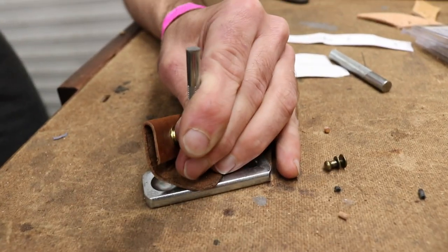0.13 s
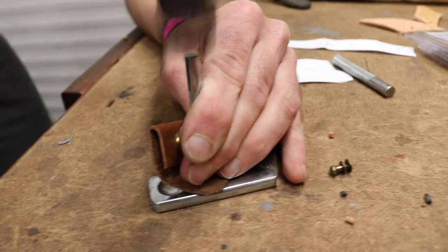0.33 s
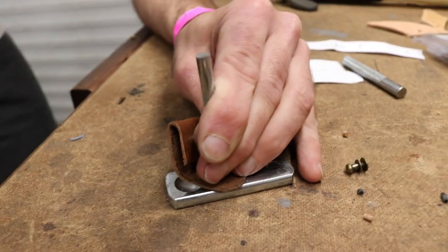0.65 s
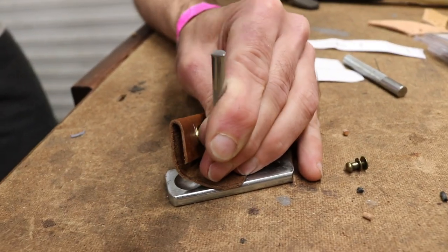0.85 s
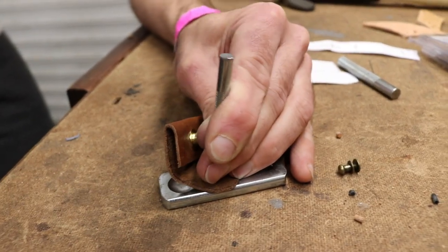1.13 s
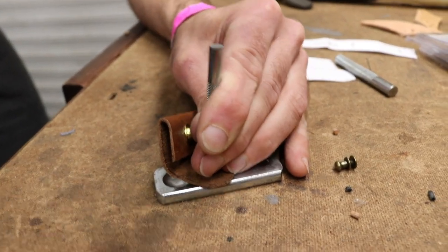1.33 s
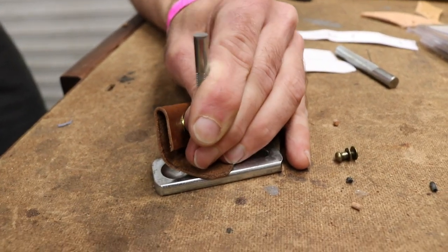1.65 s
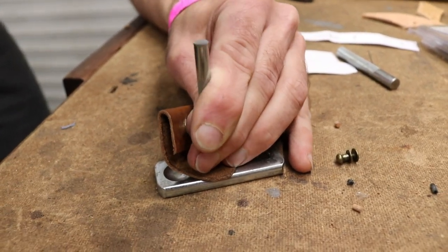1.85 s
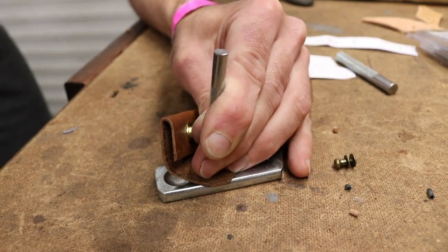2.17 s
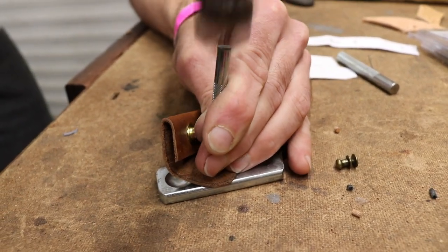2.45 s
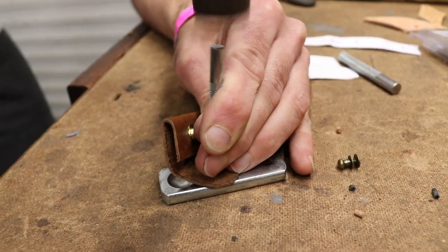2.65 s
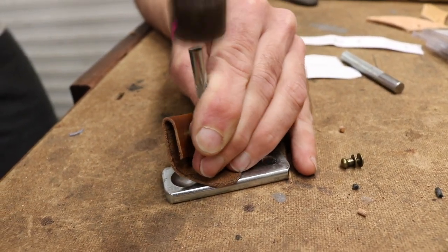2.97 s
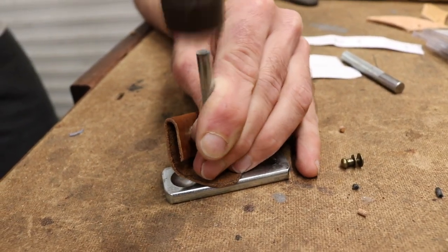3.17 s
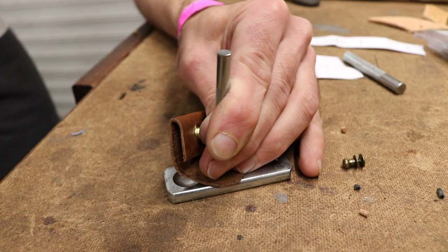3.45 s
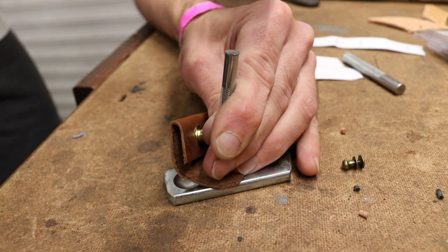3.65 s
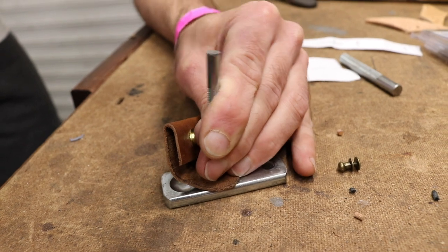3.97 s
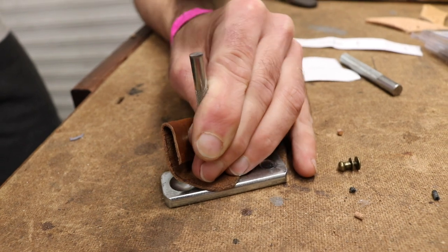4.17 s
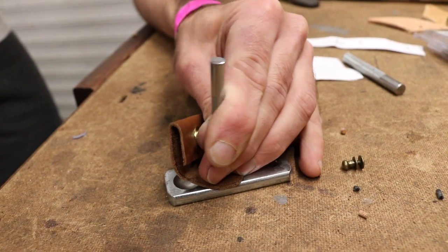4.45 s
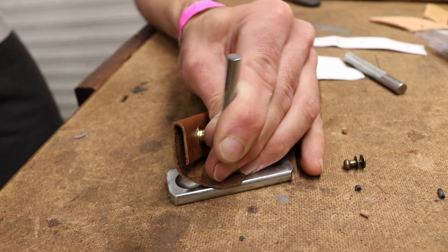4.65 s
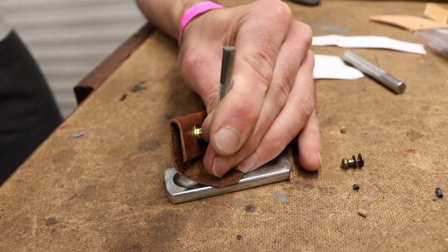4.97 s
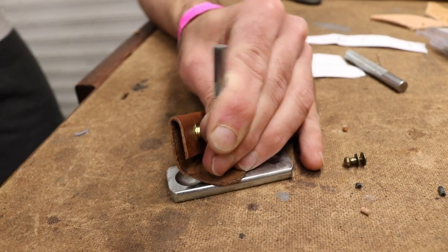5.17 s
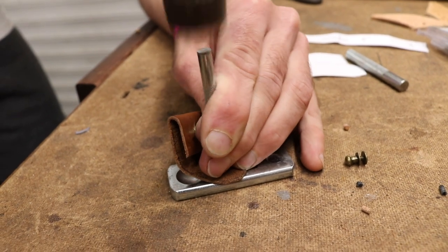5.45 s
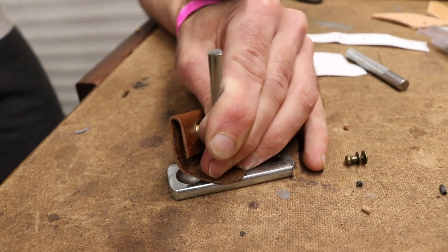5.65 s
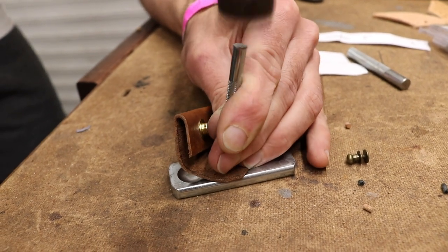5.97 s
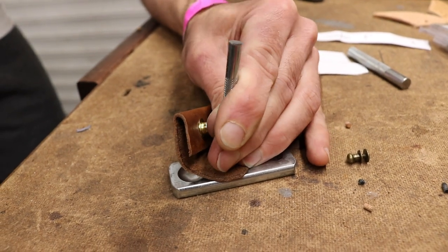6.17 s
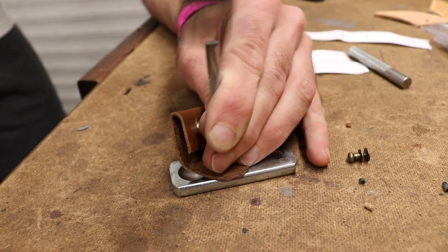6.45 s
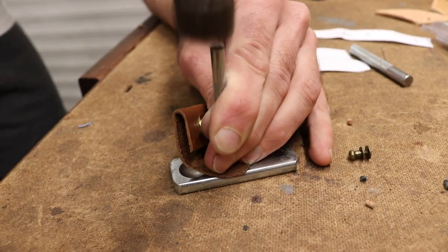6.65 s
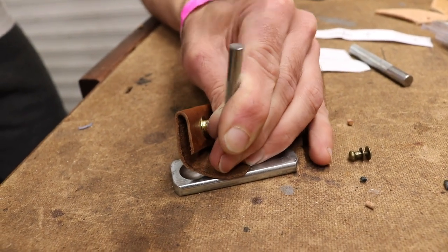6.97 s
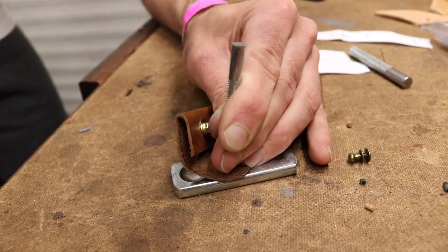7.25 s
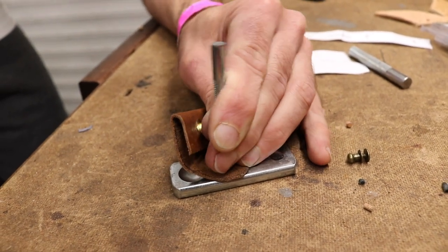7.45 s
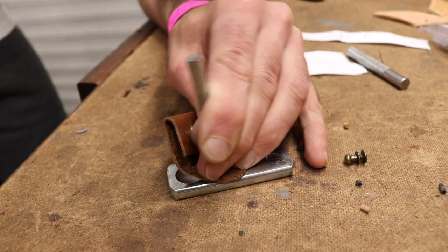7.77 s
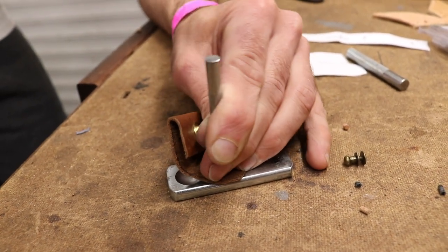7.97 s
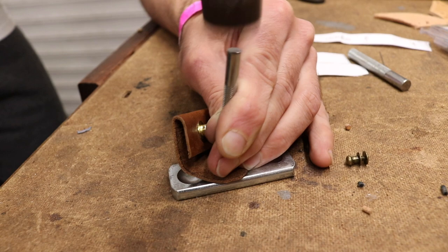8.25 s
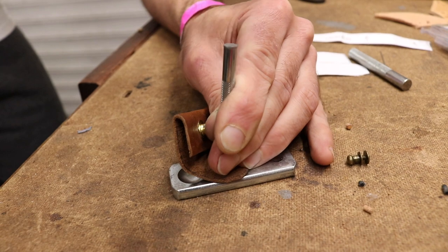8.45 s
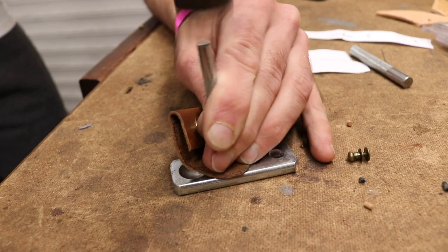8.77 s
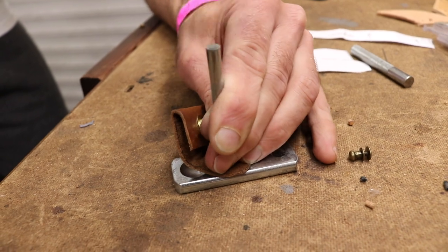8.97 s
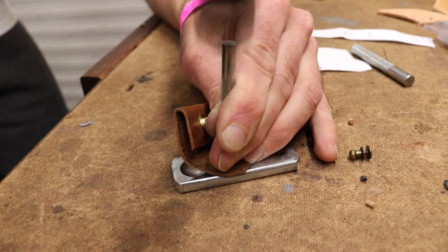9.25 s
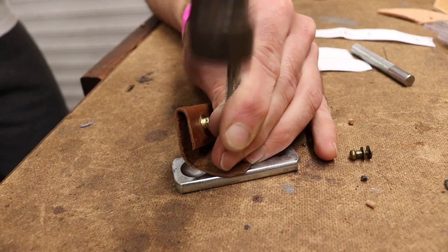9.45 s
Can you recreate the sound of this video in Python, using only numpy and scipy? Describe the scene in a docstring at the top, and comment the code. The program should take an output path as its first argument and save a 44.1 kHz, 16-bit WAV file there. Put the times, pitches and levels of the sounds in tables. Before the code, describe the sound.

Rapid, steady hammer taps on a hand-held steel rod, each a bright metal click with a wooden workbench knock, in a small workshop.

```python
"""Hammering a brass snap shut

A hammer taps a hand-held steel tool 54 times, closing a brass snap on a small anvil on a workbench. Each tap is
a click of steel and crushing brass, a faint high ring and a knock of the wooden bench top. The first taps are
stronger and brighter while the brass still gives; then they level off. A small workshop echoes every tap, and
the loudest peaks are flattened."""
import sys
import numpy as np
from scipy import signal
from scipy.fft import rfft, irfft, next_fast_len
from scipy.io import wavfile
from scipy.ndimage import uniform_filter1d

SR = 44100
rng = np.random.default_rng(int(sys.argv[2]) if len(sys.argv) > 2 else 0)


def to_wav(s):
    """Save 16-bit WAV."""
    ch = np.atleast_2d(s).T  # columns
    pcm = np.round(np.clip(ch, -1, 1) * 32767)  # PCM
    wavfile.write(sys.argv[1], SR, pcm.astype(np.int16))


N = 424241

# the hammer taps: t/s, hardness of the contact/dB, slip of the brass/dB
HAMMER_TAPS = [(0.0555, 1.5, 0.5), (0.2342, 2, -2.0), (0.4146, 1.5, 0.5), (0.5908, -1.0, -0.5),
               (0.764, 0.5, -3), (0.9523, -1.0, 2.5), (1.1337, -2.5, 3.0), (1.305, -3, 3),
               (1.4824, 0.5, 0.5), (1.6539, 4, -5), (1.836, -1, -2.5), (2.0064, 0, -1), (2.188, -2.5, 1),
               (2.3615, -2.0, 4.5), (2.5318, -1, 4.0), (2.6969, 2.0, -0.5), (2.8693, 3, -2.5),
               (3.0444, -2, -3.5), (3.221, -3, -1), (3.4018, -5, 0.5), (3.5707, -2.0, -0.5),
               (3.749, -1.5, 1.5), (3.9212, 1.5, -1), (4.0972, 1.5, -2), (4.2658, -1, -5),
               (4.4376, -2.5, 0.5), (4.6145, -4.5, 2.0), (4.7905, -3.0, 3.5), (4.9656, -3, -0.5),
               (5.137, 0.5, -2), (5.3108, 1.5, -3.5), (5.4905, -1, -5), (5.6787, -2, -1.5),
               (5.8504, -1, -3), (6.0197, -1.5, 5.5), (6.1913, 0.0, 2.5), (6.3619, 0.5, -4.5),
               (6.537, 1, -0.5), (6.7252, -4.5, -1.5), (6.8973, -7.0, 2.5), (7.0751, -4, 2.5),
               (7.238, -1.5, 4), (7.4136, 2, -2), (7.5902, 2.5, -4.5), (7.7613, -3, 1.5),
               (7.9415, -4.0, 1.5), (8.1274, -1.5, -0.5), (8.2977, 0.5, 3.0), (8.472, 1, -2.5),
               (8.6352, 2, -4), (8.8086, 2.0, 1.5), (8.9744, 0.0, -0.5), (9.1516, 0.0, 2.5), (9.3337, 4, 0)]
# while the snap is loose, the taps are stronger and the brass crushes more loudly
LOOSE_FORCE_DB, LOOSE_CRUSH_DB = 2.5, 11


def metal_click(near_db=-4, spread_db=-3, lead_s=.0007, crush_s=.00024, chatter_db=-8, chatter_s=.028,
                peak_hz=9000, peak_db=5, peak_octaves=.087, wander_octaves=.13, steel_hz=6000):
    """Steel hits steel and crushes brass. Returns the click heard close up and the one sent to the walls."""
    # tone of the click close up: f/Hz, level/dB
    near_tone = [(1200, -30), (2800, 0.5), (4400, 3), (5700, -13), (7000, -2.5), (9500, -1.5), (11500, -8),
                 (13500, -9.5), (15500, -8.5), (17000, -23.5)]
    # tone of the click as it spreads to all sides: f/Hz, level/dB
    spread_tone = [(700, -16.5), (1500, 16), (2700, 11.5), (3600, 9), (4400, -0.5), (5700, 0), (7000, 3),
                   (10000, -1.5), (12000, -7), (16000, -18)]
    t, hz = np.arange(2048) / SR, np.fft.rfftfreq(512, 1 / SR)
    near, spread = np.zeros((2, N))
    # the steel makes the lower part of the click, the brass the upper
    steel = 1 / (1 + (hz / steel_hz) ** 6)
    brass = 1 - steel
    for s, hard_db, slip_db in HAMMER_TAPS:
        # brass gives in a burst of tiny slips, then the loose parts chatter
        slips, chatter = rng.standard_normal((2, len(t)))
        burst = unit_energy(slips * (t / crush_s) ** 2 * np.exp(-t / crush_s))
        burst += gain(chatter_db) * unit_energy(chatter * gain(-60 * t / chatter_s))
        # a bright band moves a little as the tool leans
        octaves = np.log2((hz + 1) / peak_hz) + wander_octaves * rng.standard_normal()
        bright_db = peak_db * np.exp(-.5 * (octaves / peak_octaves) ** 2)
        tick = unit_energy(signal.fftconvolve(burst, pulse(curve(near_tone, hz) + bright_db)))
        strength_db = LOOSE_CRUSH_DB * looseness(s) + .7 * steel * hard_db + brass * slip_db
        # the click comes just before the bench moves
        add(near, s - lead_s, signal.fftconvolve(tick, pulse(near_db + strength_db)))
        # a hard contact sends much more sound into the room
        sent_db = spread_db + 1.2 * steel * hard_db + .26 * (brass * slip_db + bright_db)
        # the brass clinks at other pitches on every tap
        clink_db = 3 * uniform_filter1d(rng.standard_normal(len(hz)), size=14) * np.sqrt(14)
        add(spread, s, pulse(curve(spread_tone, hz) + sent_db + brass * clink_db))
    return near, spread


def bench_knock(level_db=.17, soften_hz=1300, bass_hz=130, upper_hz=1050):
    """Each blow passes through tool and anvil and rings the same notes of the wooden bench top."""
    # notes of the bench with the anvil on it: f/Hz, level/dB, time to fade by 60 dB/s
    bench_notes = [(161.7, -31, 0.1), (251.7, -38, 0.12), (292.3, -20.5, 0.041), (360.5, -20, 0.037),
                   (411.1, -29.5, 0.15), (510.3, -16.5, 0.056), (533.1, -20, 0.061), (583.8, -12.5, 0.035),
                   (677.8, -18.5, 0.056), (736, -31, 0.15), (751, -30, 0.1), (860, -16.5, 0.04),
                   (960, -37.5, 0.2), (1080, -19.5, 0.038), (1144, -37.5, 0.11), (1299, -31.5, 0.07),
                   (1500, -49.5, 0.029), (1605, -32, 0.072), (1755, -19, 0.022), (2161, -11.5, 0.013),
                   (2744, -16.5, 0.039), (2983, -7, 0.012), (3320, -18, 0.11), (4140, -15, 0.042)]
    hz, db, fade_s = np.transpose(bench_notes)
    # wood cannot hold a high note for long
    fade_s = np.minimum(fade_s, .019 * (3000 / hz) ** 2)
    notes, out = ringing(np.c_[hz, db, fade_s]), np.zeros(N)
    upper = 1 / (1 + (upper_hz / hz) ** 6)
    leans_db = rng.standard_normal((len(HAMMER_TAPS), len(bench_notes)))
    for (s, hard_db, _), lean_db in zip(HAMMER_TAPS, leans_db):
        # only the upper notes feel how hard the contact is and how the tool leans
        strength_db = LOOSE_FORCE_DB * looseness(s) + upper * (hard_db + lean_db)
        add(out, s, -gain(strength_db) @ notes)
    # leather under the snap softens the blow; a board gives off little deep bass
    softened = pass_filter(out, soften_hz, "low", order=2)
    return gain(level_db) * pass_filter(softened, bass_hz, "high", order=2)


def tool_ring(level_db=-50, split_hz=45, scatter_db=3):
    """The steel rod rings briefly between the fingers."""
    # notes of the rod: f/Hz, level/dB, time to fade by 60 dB/s
    rod_notes = [(5120, 1, .055), (11850, -1, .06), (13330, -1, .05)]
    notes, out = ringing(rod_notes), np.zeros(N)
    t = np.arange(notes.shape[1]) / SR
    upper = np.arange(len(rod_notes)) > 0
    grips = rng.uniform(.2, 1, (len(HAMMER_TAPS), len(rod_notes), 1))
    chances = rng.standard_normal((len(HAMMER_TAPS), len(rod_notes)))
    for (s, hard_db, _), grip, chance in zip(HAMMER_TAPS, grips, chances):
        # a soft, glancing tap wakes the upper notes; chance decides which stands out
        strength_db = LOOSE_FORCE_DB * looseness(s) + upper * (scatter_db * chance - .8 * hard_db)
        # the grip splits each note into a close pair that wobbles
        wobble = np.cos(2 * np.pi * split_hz * grip * t)
        add(out, s, gain(strength_db) @ (notes * wobble))
    return gain(level_db) * out


def snap_ring(ring_hz=6750, level_db=-57, fade_s=.17):
    """The brass parts ring while they are still loose."""
    ring, out = ringing([(ring_hz, level_db, fade_s)])[0], np.zeros(N)
    for s, *_ in HAMMER_TAPS:
        add(out, s, looseness(s) * ring)
    return out


def workshop_echo(sound, first_s=.0092, build_s=.0014):
    """Many reflections from the walls blur into one echo; each band of pitch dies at its own speed."""
    # bands of the echo: f/Hz, level/dB, time to fade by 60 dB/s
    echo_bands = [(55, -7.5, 0.33), (128.4, -13.5, 0.1), (282, -27, 0.8), (500, -26, 0.29),
                  (900, -21.5, 0.29), (1600, -22.5, 0.22), (2800, -23.5, .28), (4500, -23.5, 0.11),
                  (8000, -24.5, 0.14), (12000, -23, .21), (16000, -24.5, .13)]
    t, hz = np.arange(SR) / SR, np.fft.rfftfreq(SR, 1 / SR)
    noise_spectrum, tail = rfft(rng.standard_normal(SR)), np.zeros(SR)
    onset = np.clip((t - first_s) / build_s, 0, 1)
    centres_hz = np.transpose(echo_bands)[0]
    for (_, db, fade_s), weights in zip(echo_bands, np.eye(len(echo_bands))):
        band = curve(np.c_[centres_hz, weights], hz)
        reflections = irfft(noise_spectrum * band, SR) * onset * gain(-60 * t / fade_s)
        tail += gain(db) * np.sqrt(band.mean()) * unit_energy(reflections)
    return signal.fftconvolve(sound, tail)


def standing_waves(build_s=.041):
    """A few low notes swell between the walls after each knock and outlast it."""
    # notes of the room: f/Hz, level/dB, time to fade by 60 dB/s
    room_notes = [(85, -55, .5), (121, -46, .45), (305, -47, .25), (415, -39, .28), (548, -44, .22),
                  (818, -45, .22)]
    hum, out = ringing(room_notes).sum(0), np.zeros(N)
    hum *= 1 - np.exp(-np.arange(len(hum)) / SR / build_s)
    for s, *_ in HAMMER_TAPS:
        add(out, s, gain(LOOSE_FORCE_DB * looseness(s)) * hum)
    return out


def hiss(level_db=-72, low_hz=1000, high_hz=4000, decay_s=1.7):
    """A faint hiss lies under the first taps and fades away."""
    noise = pass_filter(rng.standard_normal(N), low_hz, "high", order=2)
    noise = pass_filter(noise, high_hz, "low", order=1)
    return gain(level_db) * np.exp(-np.arange(N) / SR / decay_s) * noise / noise.std()


def room_air(level_db=-71):
    """The quiet room gives a faint steady rumble with a trace of hiss."""
    # tone of the air: f/Hz, level/dB
    air_tone = [(25, -5.5), (70, 10.5), (200, -7.5), (600, -16.5), (1500, -30.5), (4000, -27), (9000, -31),
                (16000, -31.5)]
    size = next_fast_len(N)
    shape = gain(curve(air_tone, np.fft.rfftfreq(size, 1 / SR)))
    noise = irfft(rfft(rng.standard_normal(size)) * shape, size)[:N]
    return gain(level_db) * noise / noise.std()


def looseness(s, closing_s=1.4):
    """How loose the snap is at s seconds: 1 at the start, nearing 0 as it closes."""
    return np.exp(-s / closing_s)


def ringing(notes):
    """One fading tone for each note, as rows."""
    hz, db, fade_s = np.transpose(notes)[:, :, None]
    t = np.arange(SR // 2) / SR
    return gain(db - 60 * t / fade_s) * np.cos(2 * np.pi * hz * t)


def pulse(levels_db):
    """The shortest pulse that has the given level at each frequency."""
    cepstrum = irfft(np.log(gain(levels_db)))
    # folding the second half onto the first packs the energy at the start
    half = len(cepstrum) // 2
    cepstrum[1:half] *= 2
    cepstrum[half + 1:] = 0
    return irfft(np.exp(rfft(cepstrum)))


def gain(db):
    """Turns decibels into a factor to multiply by."""
    return 10 ** (np.asarray(db) / 20)


def curve(points, hz):
    """Joins (frequency, value) points by straight lines along a pitch scale."""
    points_hz, values = np.transpose(points)
    return np.interp(np.log(hz + 1), np.log(points_hz + 1), values)


def unit_energy(sound):
    """Scales a sound to energy 1."""
    return sound / np.linalg.norm(sound)


def add(mix, s, sound):
    """Lays a sound into the mix at s seconds."""
    part = mix[max(round(s * SR), 0):][:len(sound)]
    part += sound[:len(part)]


def pass_filter(sound, hz, kind, order):
    """Keeps the "low" or "high" side of hz; a higher order cuts more steeply."""
    return signal.sosfilt(signal.butter(order, hz, kind, fs=SR, output="sos"), sound)


def scene(board_hz=1400, ring_boost_db=7, beat_s=.16):
    """The taps, their echo and the still room."""
    knock = bench_knock()
    ring = tool_ring() + snap_ring()
    click, spread = metal_click()
    # the wide board fills the room with the lows, the small metal parts with the highs
    sent = pass_filter(knock, board_hz, "low", order=6) + spread + gain(ring_boost_db) * ring
    # the tapping is already under way: the room still rings from a tap one beat earlier
    beat = round(beat_s * SR)
    echo = workshop_echo(np.r_[sent[:beat], sent])[beat:beat + N]
    return (knock + click + ring + echo + standing_waves() + hiss() + room_air())[None]


def record(dry, ceiling_db=-7.6, sharpness=6, low_cut_hz=40, high_cut_hz=16400):
    """A fast limiter flattens the loudest peaks; then the deepest bass and highest treble are cut."""
    flattened = dry / (1 + abs(dry / gain(ceiling_db)) ** sharpness) ** (1 / sharpness)
    trimmed = pass_filter(flattened, low_cut_hz, "high", order=2)
    treble_cut = signal.firwin(255, high_cut_hz, window=("kaiser", 9), fs=SR)
    return signal.oaconvolve(trimmed, treble_cut[None], "same")


dry = scene()
out = record(dry)
to_wav(out)
```